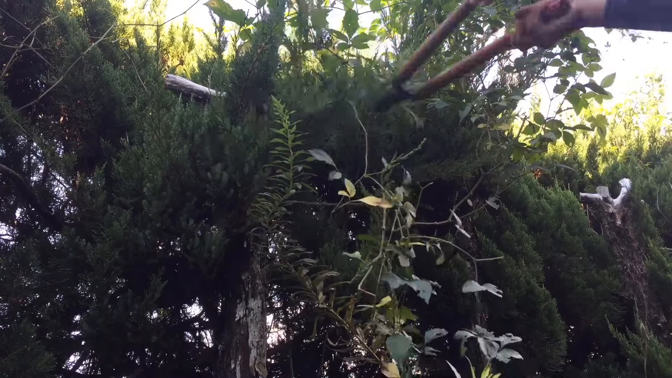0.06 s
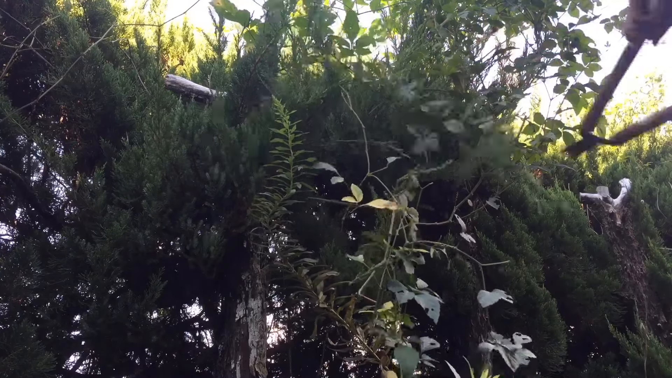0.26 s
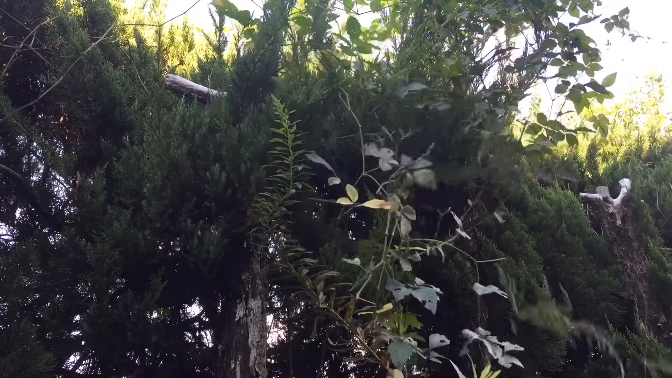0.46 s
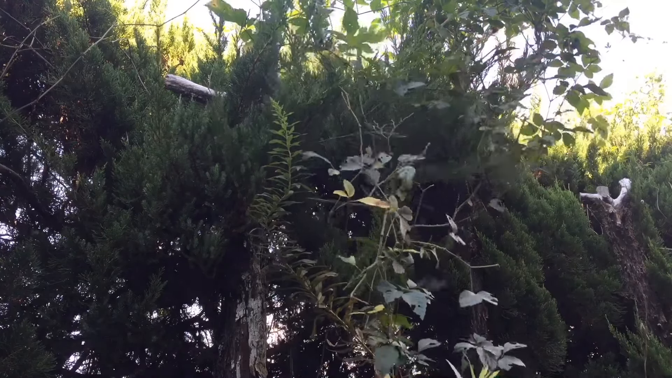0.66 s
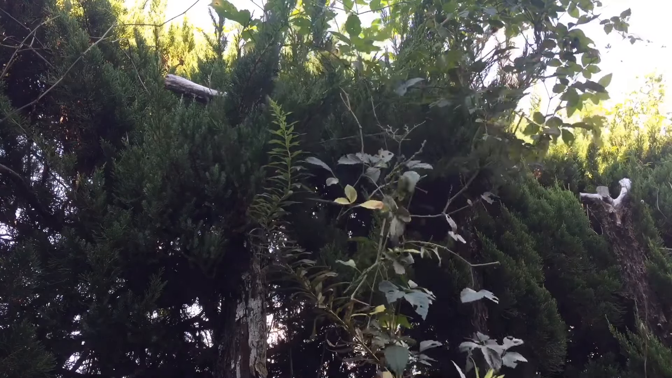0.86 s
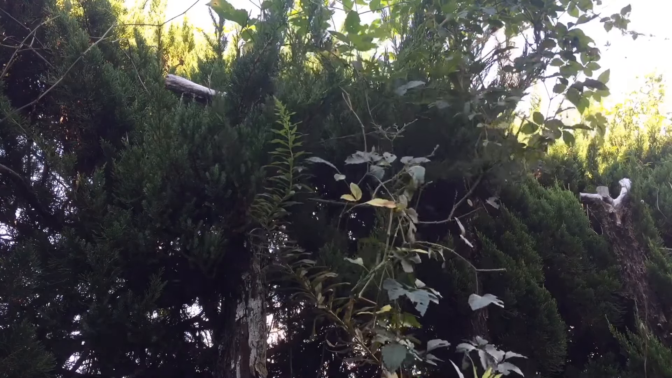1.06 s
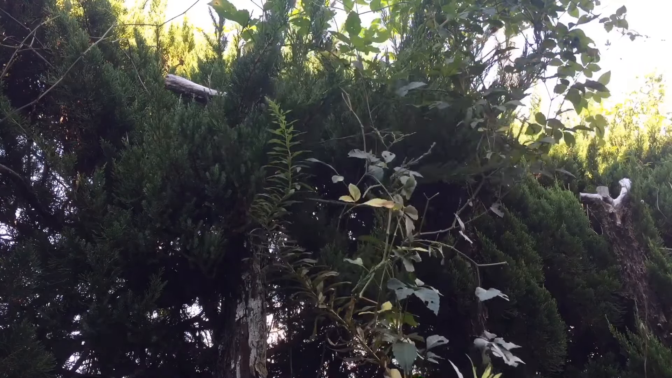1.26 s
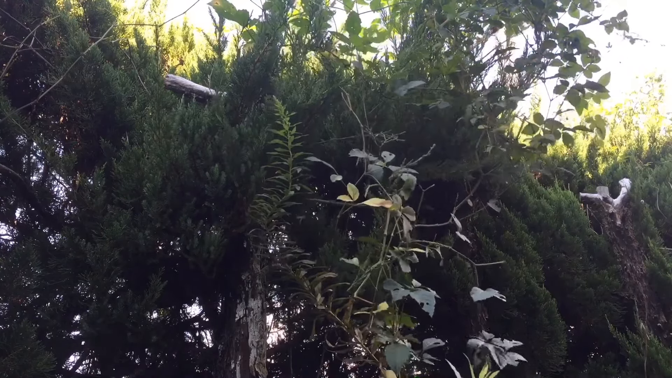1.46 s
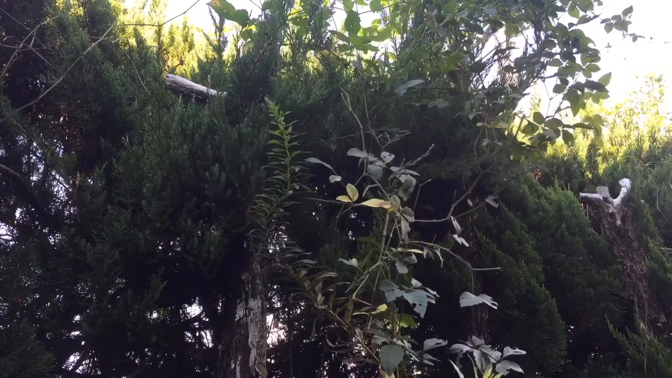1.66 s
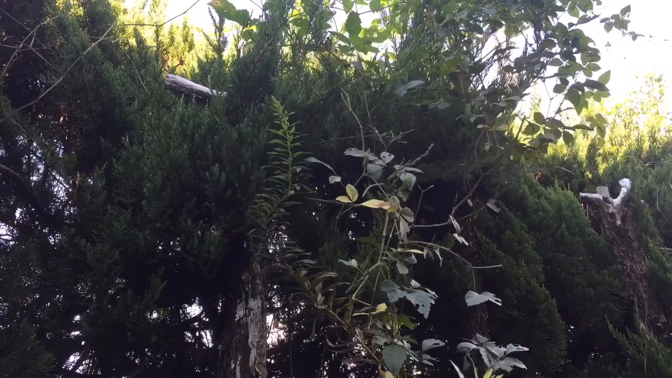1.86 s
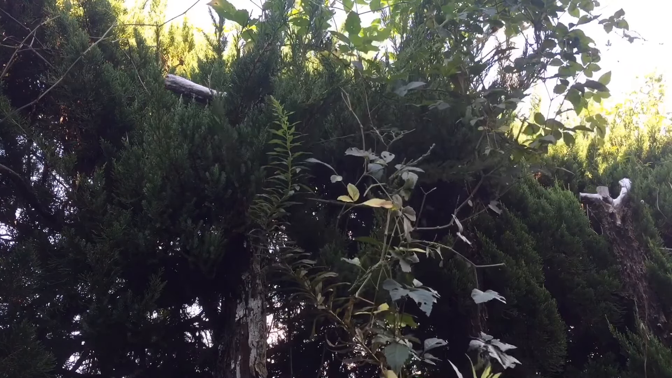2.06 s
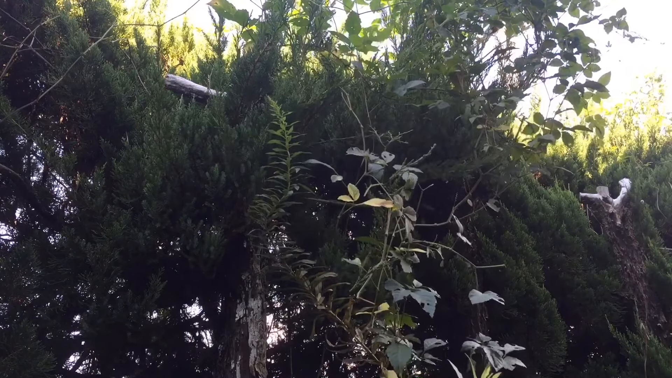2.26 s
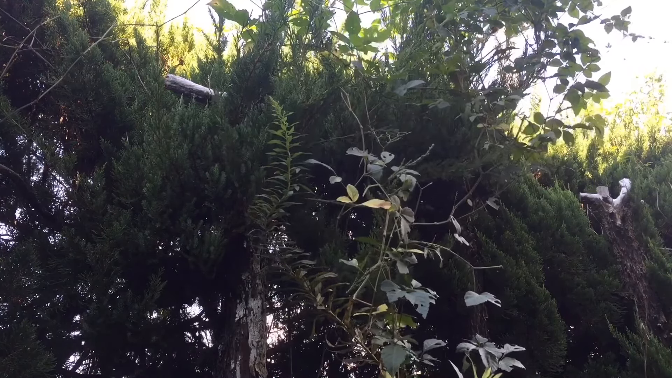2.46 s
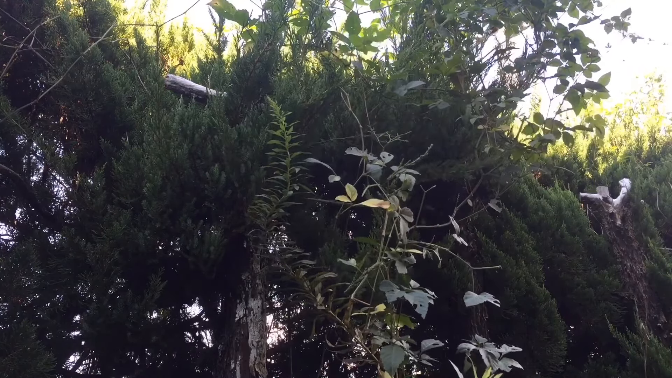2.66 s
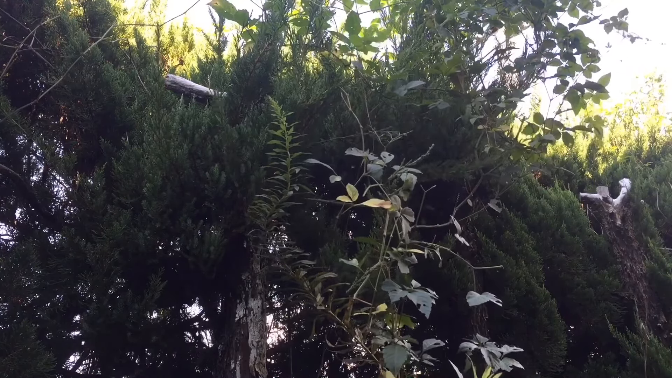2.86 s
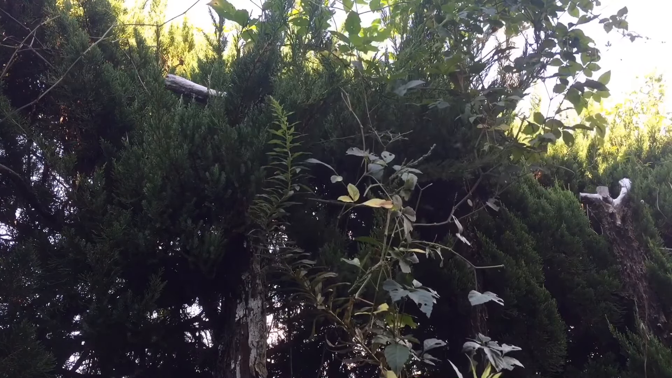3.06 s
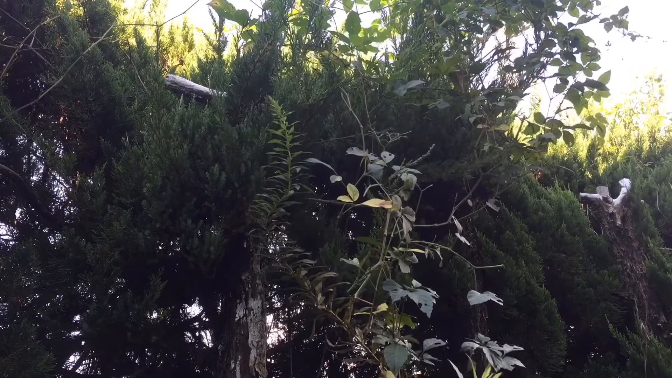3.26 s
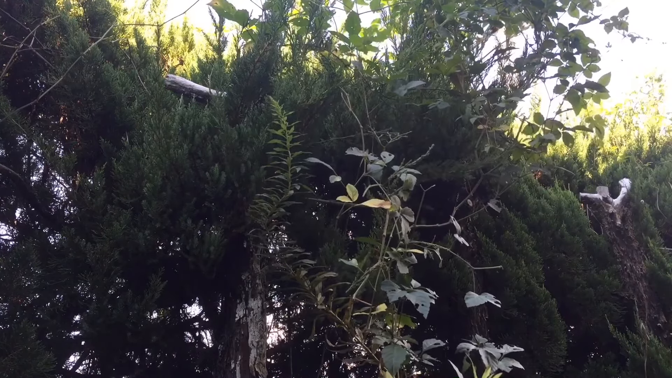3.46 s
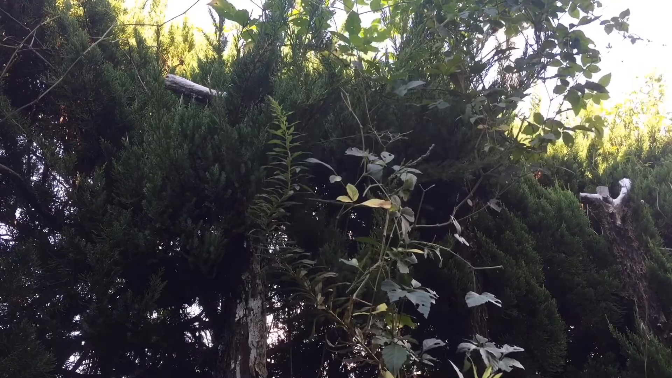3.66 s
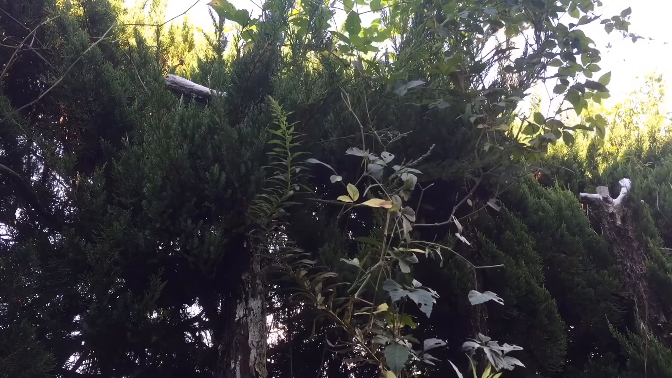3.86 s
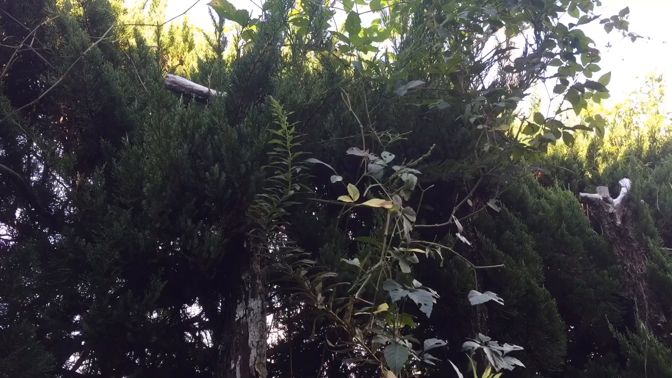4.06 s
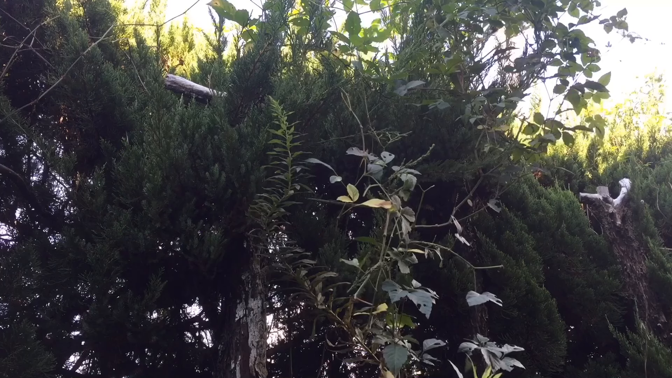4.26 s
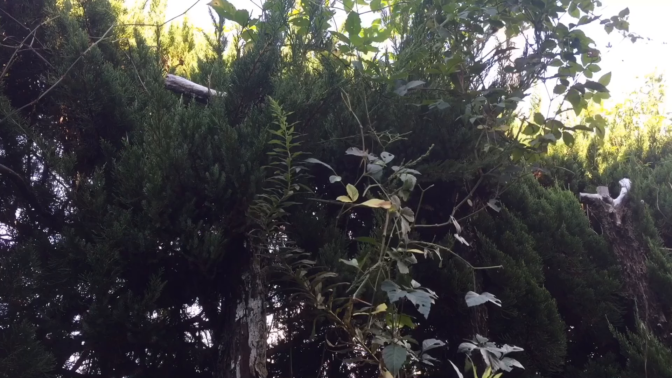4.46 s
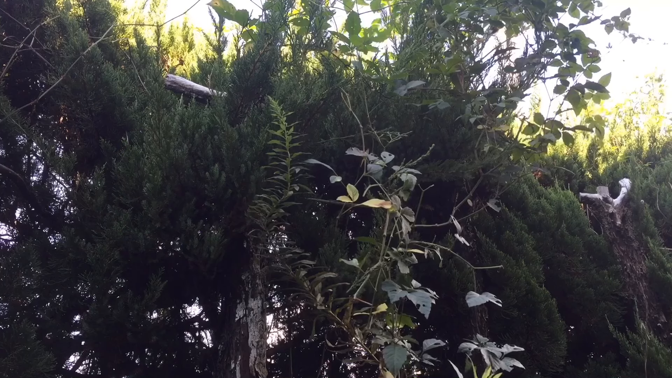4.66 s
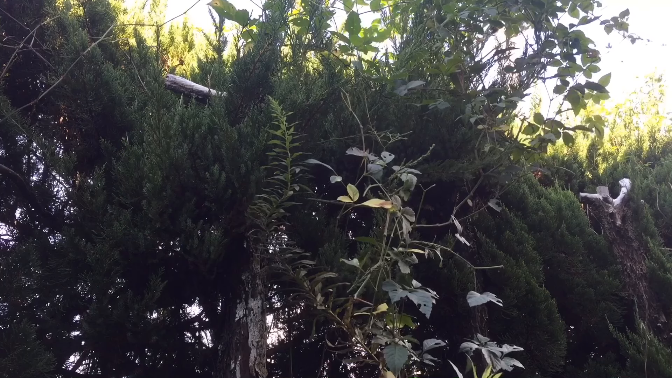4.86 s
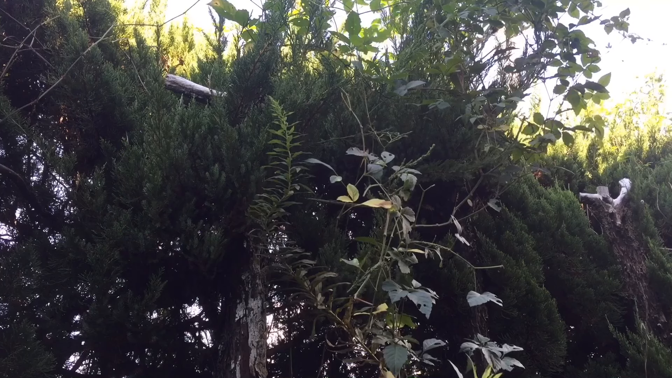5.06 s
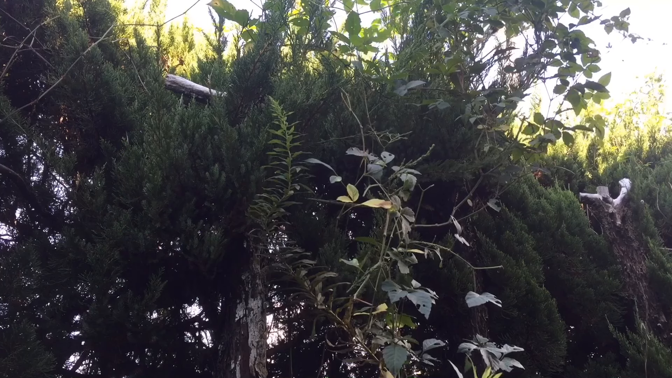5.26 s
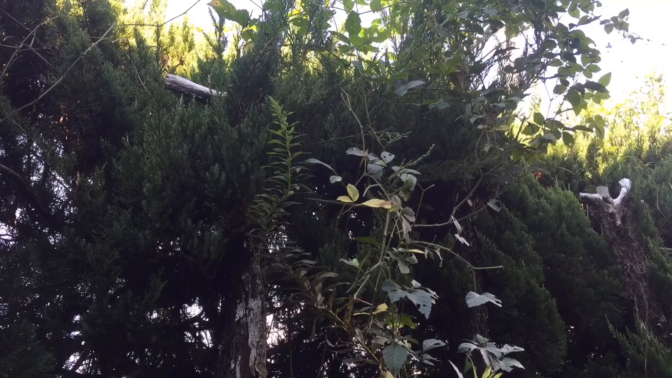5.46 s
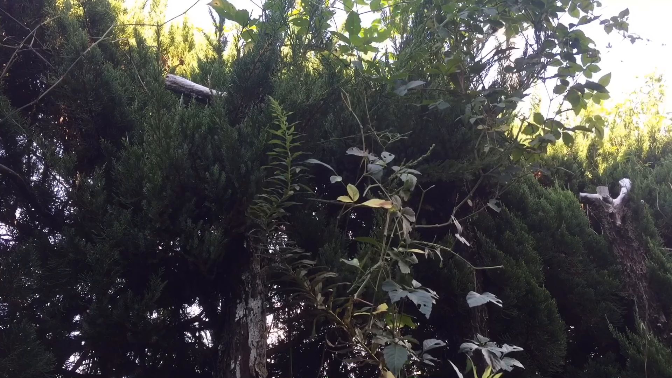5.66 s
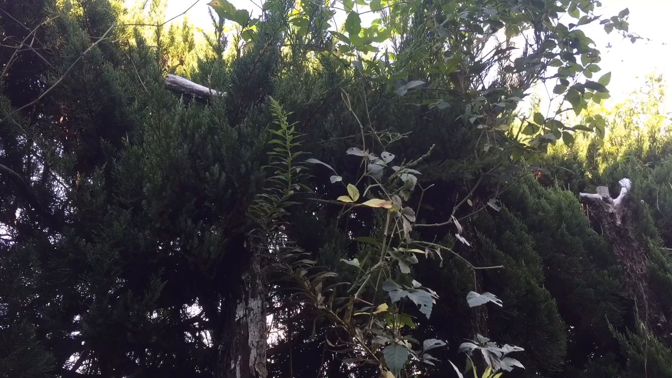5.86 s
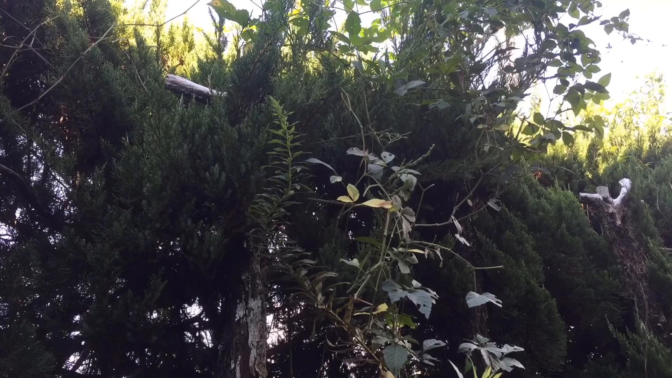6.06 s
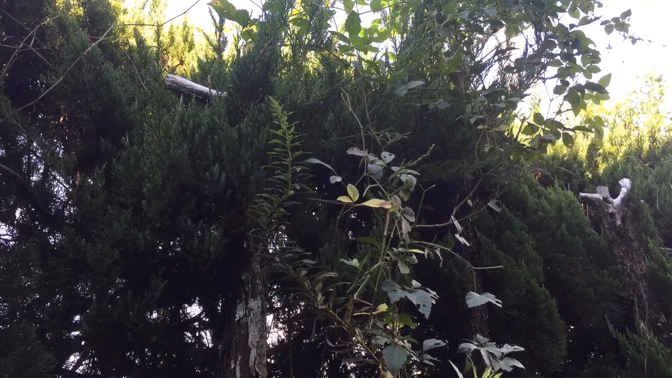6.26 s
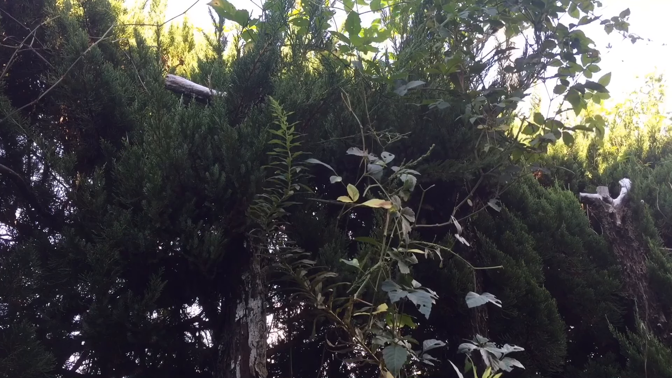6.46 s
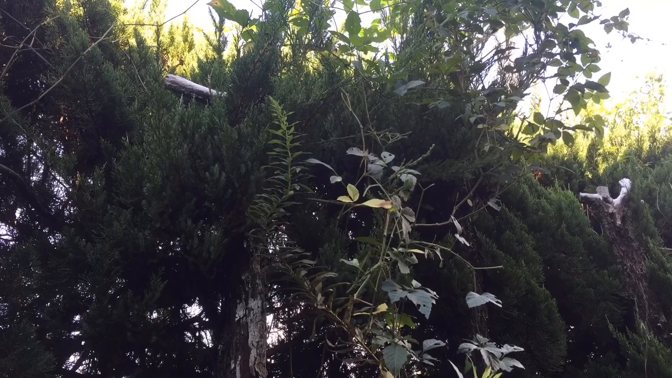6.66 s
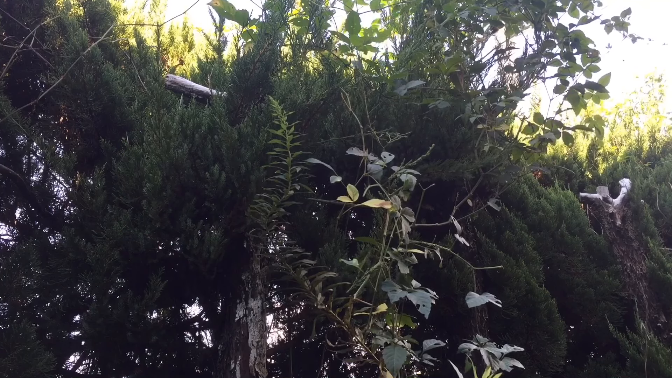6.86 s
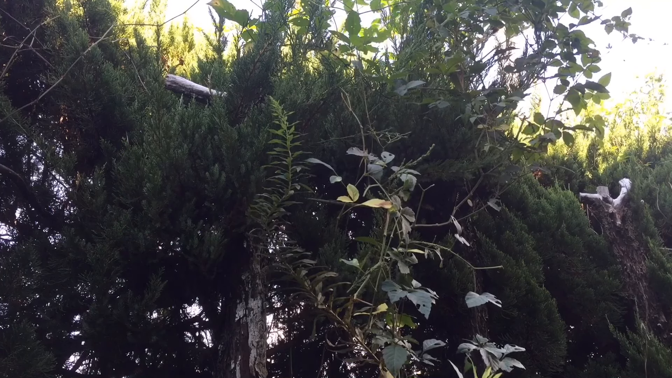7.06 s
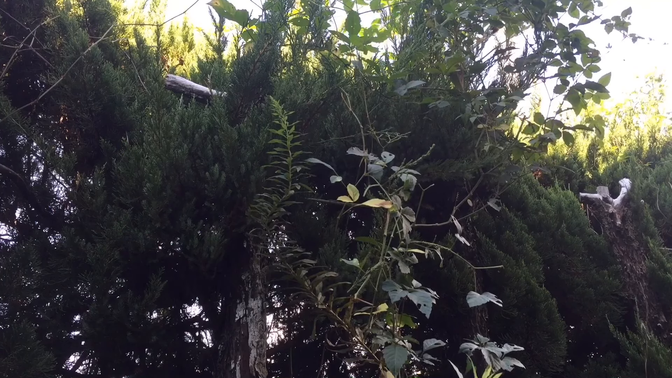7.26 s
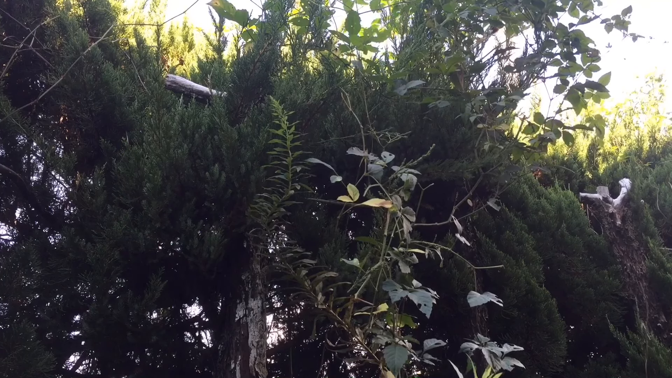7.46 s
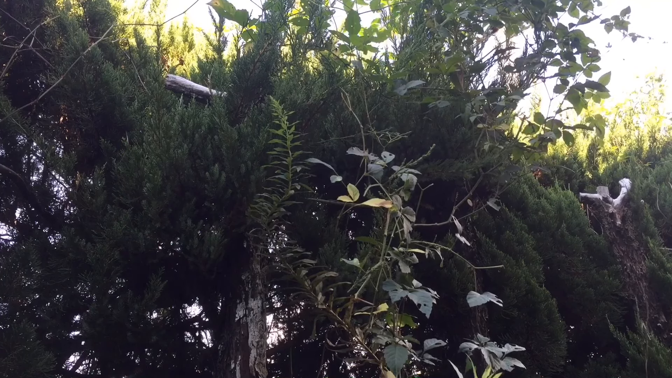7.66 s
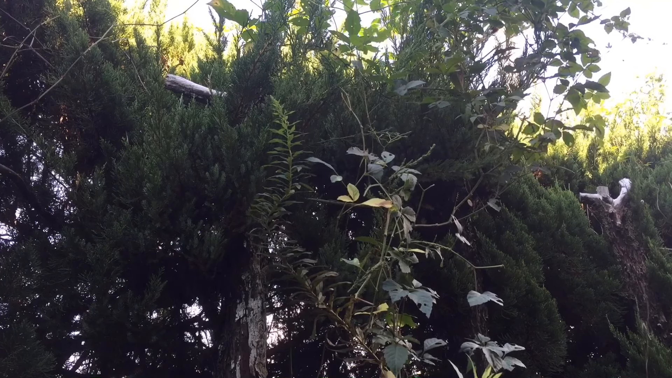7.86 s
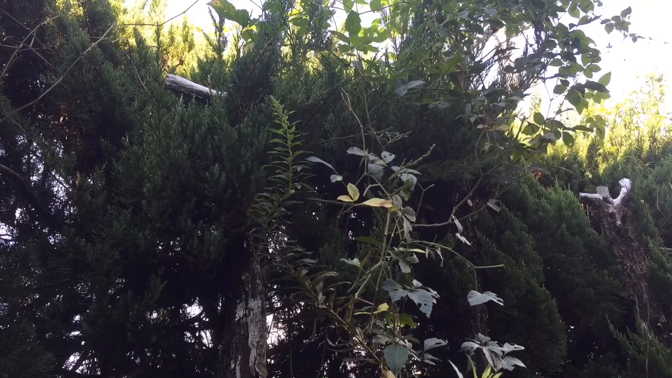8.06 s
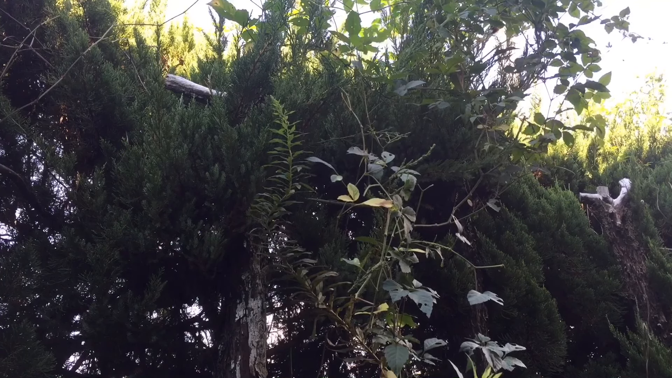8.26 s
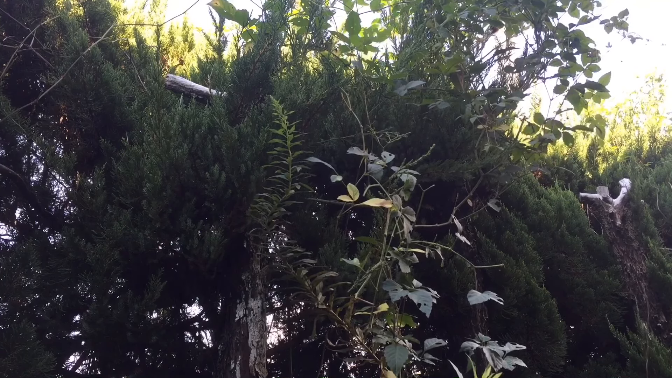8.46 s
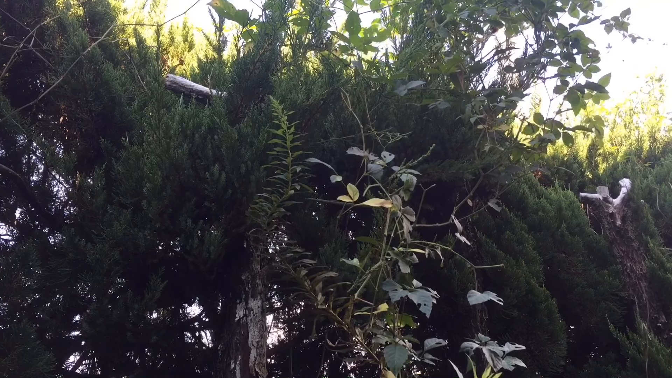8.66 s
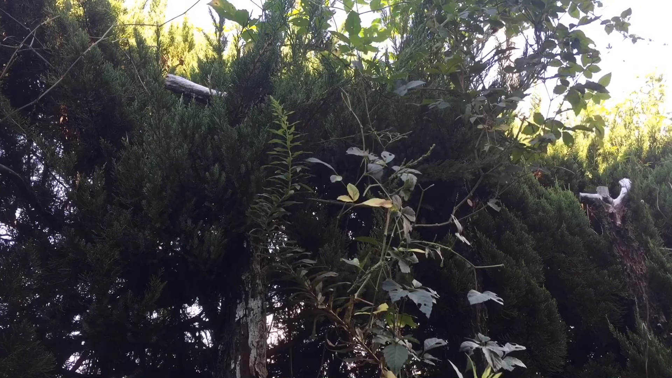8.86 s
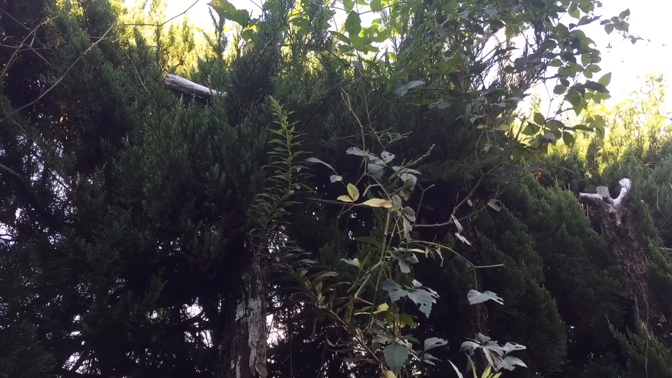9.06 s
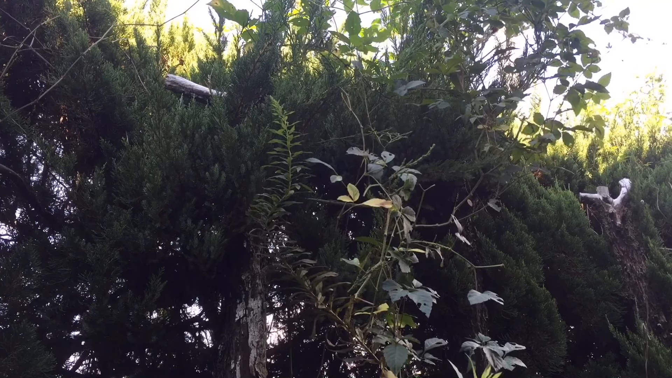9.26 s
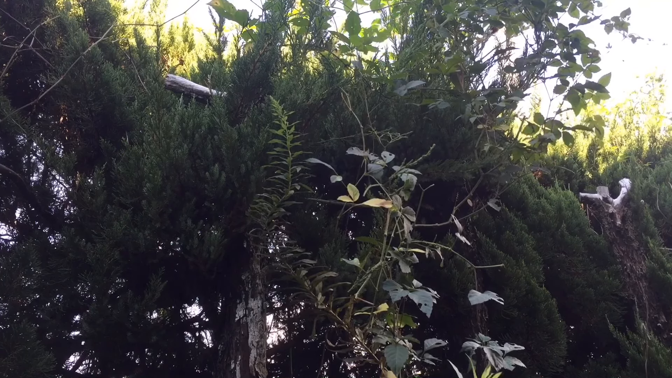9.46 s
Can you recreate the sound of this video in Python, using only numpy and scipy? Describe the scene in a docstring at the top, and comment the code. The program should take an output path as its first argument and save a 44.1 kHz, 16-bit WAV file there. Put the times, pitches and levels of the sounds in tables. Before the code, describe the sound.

Long-handled shears bite through a dry branch, then twigs snap and leaves crunch over wind rumble and a faint hum, with a brief hiss late.

```python
"""A garden, on one microphone. Wind buffets it at first, and two far machines hum a few hertz apart,
so that the bass throbs throughout. Close by, long-handled shears bite through a dry branch; then twigs
snap and dry leaves crunch. Halfway, a bird chirps once, faintly. Later a branch is dragged nearby,
and near the end something hisses for a second like a spray nozzle."""
import sys
import numpy as np
from scipy import signal
from scipy.fft import rfft, irfft, next_fast_len
from scipy.io import wavfile
from scipy.ndimage import uniform_filter1d

SR = 44100
rng = np.random.default_rng(int(sys.argv[2]) if len(sys.argv) > 2 else 0)


def generate_wav(sig):
    """Save sig (samples, or channels by samples) to the path in sys.argv[1] as 16-bit PCM at SR."""
    pcm = np.round(np.clip(np.atleast_2d(sig).T, -1, 1) * 32767).astype(np.int16)
    wavfile.write(sys.argv[1], SR, pcm)


N = 419832
TIME = np.arange(N) / SR


def gain_of(db):
    """Decibels to an amplitude factor."""
    return 10 ** (np.asarray(db) / 20)


def unit_rms(x):
    """Scales to rms 1."""
    return x / np.sqrt(np.mean(x ** 2) + 1e-20)


def shaped(x, points):
    """Filters by a spectrum of (Hz, dB) points."""
    point_hz, db = np.transpose(points)
    size = next_fast_len(len(x))
    hz = np.fft.rfftfreq(size, 1 / SR)
    response = gain_of(np.interp(np.log(hz + 1), np.log(point_hz + 1), db))
    return irfft(rfft(x, size) * response, size)[:len(x)]


def curve(points, outside=None):
    """Joins (seconds, value) points into a curve over the whole time."""
    return np.interp(TIME, *np.transpose(points), left=outside, right=outside)


def body(x, modes):
    """Rings x through steep (Hz, width Hz, dB) resonances of alternating sign; rms 1."""
    out = 0
    for k, (hz, width, db) in enumerate(modes):
        peak = signal.iirpeak(min(hz, .45 * SR), hz / width, SR)
        out += (-1) ** k * gain_of(db) * signal.lfilter(*peak, signal.lfilter(*peak, x))
    return unit_rms(out)


def wander(hz):
    """Random drift, mostly slower than hz; rms 1."""
    return unit_rms(shaped(rng.standard_normal(N), [(hz, 0), (4 * hz, -40), (SR, -200)]))


def mottled(x, db, frame, bins, frames):
    """Random patches of db depth over pitch and time, bins wide and frames long."""
    spectra = signal.stft(x, nperseg=frame)[2]
    patches = uniform_filter1d(rng.standard_normal(spectra.shape), bins, axis=0)
    patches = uniform_filter1d(patches, frames, axis=1)
    return signal.istft(spectra * gain_of(db * unit_rms(patches)), nperseg=frame)[1][:N]


# The background beyond the garden. Each row: frequency in Hz, relative level in dB.
AIR_SPECTRUM = [(88, -11.5), (150, -3.5), (483, -14), (1140, -16), (2790, -20), (3880, -22.5),
                (4910, -23.5), (5410, -21), (8470, -24.5), (14600, -30.5), (15800, -30.5)]


def air():
    """Far leaves and town merge into a soft, nearly steady hiss."""
    return gain_of(-69 + 0.12 * wander(18)) * unit_rms(shaped(rng.standard_normal(N), AIR_SPECTRUM))


# The lower of the two far machines. Each row: time in seconds, pitch in Hz.
HUM_PITCH = [(0.0, 72.7), (0.6, 71.08), (1.19, 72.31), (1.78, 70.06), (2.38, 69.18), (2.97, 68.84),
             (3.57, 70.39), (4.16, 68.83), (4.76, 69.26), (5.36, 70.04), (5.95, 70.63), (6.54, 71.05),
             (7.14, 68.78), (7.74, 70.87), (8.33, 69.53), (8.92, 71.23), (9.52, 68.99)]
# Both machines swell together at the microphone. Each row: time in seconds, the lower one's level in dB.
HUM_LEVEL = [(0, -68), (1.2, -64), (2.4, -59), (3, -62), (4.2, -56), (5.4, -56.5), (6, -60), (6.6, -62),
             (7.2, -57), (7.8, -56), (8.9, -57.5), (9.52, -58.5)]
# The higher machine, an engine, also sounds a fifth up. Each row: time in seconds, level in dB.
FIFTH_LEVEL = [(0, -77), (2.6, -75.5), (3, -64), (5.6, -70.5), (6.6, -74.5), (9.52, -73.5)]


def machines(engine_hz=77.0):
    """Two tones beat and waver on the way through the air; the engine brings two overtones."""
    hum_turns = np.cumsum(curve(HUM_PITCH)) / SR
    engine_turns = engine_hz * TIME + .40
    hum_db = curve(HUM_LEVEL)
    tones = [(hum_turns, hum_db), (engine_turns, hum_db - 1.5),
             (1.5 * engine_turns, curve(FIFTH_LEVEL)), (2 * engine_turns, -81)]
    return np.sqrt(2) * sum(gain_of(db + 1.3 * wander(3.4)) * np.cos(2 * np.pi * turns)
                            for turns, db in tones)


# Wind rumbling on the microphone. Each row: time in seconds, level in dB.
GUSTS = [(0, -62), (.82, -49.5), (1.14, -67.5), (1.35, -56.5), (1.64, -68), (1.8, -58), (2.36, -65.5),
         (2.46, -55), (2.85, -54.5), (3.55, -63.5), (4.24, -63), (4.93, -59), (5.2, -62), (8.5, -68),
         (9.52, -67)]
# Single blows of wind on the microphone. Each row: start in seconds, level in dB, nominal pitch in Hz.
BUFFETS = [(0.077, -38, 67.6), (0.137, -46, 71), (.258, -52, 59.4), (0.342, -42.5, 69), (0.418, -43, 68.6),
           (.49, -40.5, 63), (0.559, -40, 64), (.555, -45, 184), (.584, -38.5, 110), (0.709, -34, 77.4),
           (0.762, -37.5, 107.6), (.802, -40, 133.5), (.821, -35, 60.5), (0.855, -38, 90),
           (0.973, -46, 100), (1.232, -45.5, 58), (1.34, -42.5, 63.4), (1.465, -48, 65.5),
           (1.784, -46, 67.6), (1.928, -51, 68.6), (1.985, -44, 68.5), (2.414, -45.5, 77),
           (2.458, -40, 64.5), (2.579, -41.5, 69.6), (2.651, -42.5, 110), (2.778, -41, 63.7),
           (2.895, -45.5, 87), (3.123, -53, 49)]


def wind(buffet_s=0.0502):
    """Lumpy pressure at the microphone port, and blows that swing a few times as their pitch sinks."""
    spectrum = [(18, -62), (36, -9.5), (50, 5.5), (90, 0), (140, -12.5), (260, -32), (600, -47.5)]
    rumble = unit_rms(shaped(rng.standard_normal(N), spectrum))
    out = gain_of(curve(GUSTS) + 3.3 * wander(15)) * rumble
    progress = np.arange(0, 1, 1 / (SR * buffet_s))
    envelope = np.sin(np.pi * progress ** 0.73) ** 2
    for s, db, hz in BUFFETS:
        phase = 2 * np.pi * hz * buffet_s * (1.15 * progress - 0.246 * progress ** 2)
        offset = 2 * np.pi * rng.random(2)
        swing = np.sin(phase + offset[0]) + 0.39 * np.sin(1.86 * phase + offset[1])
        sharp_edge = 0.06 * np.sin(3.28 * phase) + 0.027 * np.sin(6.1 * phase)
        add(out, s, gain_of(db) * (swing + sharp_edge) * envelope)
    return out


def add(mix, s, sound):
    """Mixes a sound in at s seconds."""
    part = mix[round(s * SR):][:len(sound)]
    part += sound[:len(part)]


def litter_breaks(per_s=6000, spread_db=3, clump_db=3):
    """Twigs and leaves give way in dense, tiny breaks of uneven size that come in clumps."""
    breaks = (rng.random(N) < per_s / SR) * rng.choice([-1., 1.], N)
    breaks *= gain_of(spread_db * np.minimum(rng.exponential(1, N), 4) + clump_db * wander(100))
    breaks += 0.53 * rng.standard_normal(N)  # leaves sliding over each other
    return mottled(breaks, db=3.2, frame=256, bins=3, frames=4)  # each bit has its own ring


# Resonances of the litter on the ground: wood, papery leaves and their finest fizz.
# Each row: centre in Hz, width in Hz, level in dB.
WOOD_MODES = [(632, 490, -4), (1016, 400, -2.5), (1244, 390, 1.5), (1616, 267, -2), (1987, 420, 2),
              (2395, 870, -3.5)]
LEAF_MODES = [(3920, 2470, 4), (5370, 1200, 4.5), (6380, 2200, 4), (8680, 3200, -10)]
FIZZ_MODES = [(9380, 420, 4.5), (12020, 6700, -4.5), (15300, 7900, -6.5)]
# Crunches near the microphone. Each row: peak time, swell and fall in seconds, the wood's peak level
# in dB, then leaf and fizz levels in dB relative to the wood.
CRUNCHES = [(.092, 0.079, .05, -58, -2.5, -6), (0.113, 0.018, 0.042, -42.5, -9, -4),
            (.139, .02, 0.038, -39.5, 3, -4), (0.164, 0.015, 0.043, -42, 0, -5),
            (.39, 0.36, 0.065, -68.5, -6, -10), (.445, 0.03, .027, -53.5, -0.5, -12),
            (.543, 0.03, 0.017, -58.5, -8, -18), (.583, 0.012, 0.043, -61.5, 10.5, 6.5),
            (.64, 0.12, 0.23, -71, 8.5, 3), (0.698, 0.01, 0.025, -45, 1, -10),
            (.782, 0.15, 0.18, -60.5, 7, 5.5), (.836, 0.051, 0.067, -66, -3, 11),
            (.862, 0.027, 0.14, -57, 7.5, 4.5), (.892, 0.026, 0.078, -47.5, 0, -10),
            (.972, .05, 0.044, -72, 13, 16), (.99, .05, 0.94, -74.5, 6, 4),
            (2.17, 0.32, 0.21, -70, -3.5, -5), (2.234, 0.086, 0.04, -70.5, 13.5, 2),
            (2.592, 0.35, .33, -70, -4, -17), (2.771, 0.028, 0.15, -59.5, -6, -21),
            (2.806, 0.015, 0.063, -46, -3.5, -13), (2.903, 0.029, 0.014, -42.5, -14, -43),
            (2.951, .008, 0.079, -50, -3, -19), (2.965, 0.041, 0.026, -45.5, -8.5, -24),
            (3.678, .025, .1, -52.5, -2, -24), (3.697, 0.033, 0.028, -48, -1.5, -28),
            (3.875, 0.024, .1, -57, 3.5, -11), (3.903, 0.059, .04, -45, 3.5, -4),
            (3.977, 0.069, 0.03, -44, 3.5, -11), (4.214, 0.16, .14, -70, -2.5, -25),
            (4.412, 0.16, 0.13, -75, 8, 3), (4.889, 0.035, .08, -63, 3, -15),
            (4.927, 0.012, 0.13, -47.5, -2, -24), (4.975, 0.1, 0.034, -54, 5.5, -19),
            (5.003, 0.14, 0.048, -66, 11, -17), (5.242, .03, 0.12, -54, 2, -21),
            (5.307, 0.052, 0.046, -59, 4, -11), (5.38, 0.37, 0.41, -69, -7, -21),
            (5.69, .02, .05, -63, -2, -2), (5.716, .03, .04, -61, -0.5, -14),
            (6.62, 1.9, .03, -68.5, -8.5, -13), (6.972, .013, 0.08, -57.5, -14, -35),
            (7.603, 0.036, 0.1, -63, -6, -31), (7.63, .03, .04, -65, -6, -25),
            (7.931, 0.046, .03, -61.5, 1, -21), (8.02, 0.012, 0.037, -44.5, -3.5, -27)]


def crunches(breaks, span_db=30):
    """Tiny breaks ring through wood and leaf; each crunch swells and falls, then the litter settles."""
    bands = np.array([body(breaks, modes) for modes in (WOOD_MODES, LEAF_MODES, FIZZ_MODES)])
    power = np.zeros((3, N))
    for s, swell_s, fall_s, db, leaf_db, fizz_db in CRUNCHES:
        at = slice(max(0, round((s - 2 * swell_s) * SR)), round((s + 1) * SR))
        t = TIME[at] - s
        settling_db = -26.5 - 92 * t
        falling_db = np.maximum(-span_db * t / fall_s, settling_db)
        wood_db = db + np.where(t < 0, span_db * t / swell_s, falling_db)
        power[:, at] += gain_of([wood_db, wood_db + leaf_db, wood_db + fizz_db]) ** 2
    return (np.sqrt(power) * bands).sum(0)


# Dry wood snapping close by, first between the blades. Each row: start in seconds, the ring's peak
# level in dB, its pitch in Hz, treble crack in dB relative to the ring.
SNAPS = [(.094, -37.5, 1260, -1), (.109, -33.5, 3030, -1), (.112, -29, 3700, 2), (.117, -35, 4070, -8),
         (.124, -32, 1940, -4), (.135, -27.5, 3920, -3), (0.139, -32.5, 1860, -3), (.158, -26.5, 2080, -2),
         (0.166, -28.5, 3060, 2.5), (.171, -39, 1980, -16), (.185, -41.5, 3780, -8),
         (.363, -50.5, 1620, -13), (.396, -51, 1160, -12), (0.446, -51, 1750, -3),
         (0.537, -51.5, 1190, -14), (0.574, -46, 6310, -1), (.698, -38.5, 4220, -7), (0.782, -49, 1230, -8),
         (0.84, -48, 880, -12), (.884, -41, 2110, 11), (.91, -35.5, 4500, -6), (.968, -34.5, 5740, -6.5),
         (1.074, -54, 3400, -4), (2.063, -55, 1830, -1), (2.792, -26.5, 4130, -4),
         (2.793, -22.5, 1534, -3.5), (2.796, -26.5, 1340, -20), (2.809, -58, 1250, -2),
         (2.893, -27.5, 1970, -32), (2.933, -48, 1500, -15), (2.952, -40, 1840, -24),
         (3.674, -36.5, 1860, -19), (3.688, -37, 1680, -5), (3.898, -31.5, 6400, -2), (3.959, -37, 4150, 1),
         (4.018, -41.5, 2140, -1.5), (4.204, -52.5, 1004, -13), (4.878, -45.5, 2000, 4),
         (4.928, -39.5, 2340, 6.5), (5.353, -47.5, 1610, -10), (5.43, -54.5, 890, -0.5),
         (5.679, -51, 1470, -5), (6.13, -51.5, 1580, -12), (6.505, -50, 1740, -20), (6.538, -55, 1100, -9),
         (6.635, -38.5, 1390, -12), (6.816, -32, 1960, -21), (6.856, -33, 2180, -16),
         (6.969, -55, 2700, -11), (6.974, -47.5, 1270, -32), (7.108, -58, 2400, -15),
         (7.12, -54, 2300, -18), (7.13, -60, 2300, -15), (7.179, -59, 1240, -2), (7.596, -49, 2650, -3),
         (7.928, -49, 1246, 4.5), (8.014, -39, 1895, 0), (8.058, -42.5, 1340, -21),
         (8.355, -33.5, 2280, -26), (8.544, -45.5, 1190, -20), (8.548, -41.5, 2870, -8),
         (8.77, -48, 6350, -11), (8.841, -38.5, 2400, 7)]


def snaps(t60_s=0.02, rise_s=0.00027):
    """A break is a sudden shower of splinters: the twig rings briefly under a bright crack."""
    t, out = np.arange(3000) / SR, np.zeros(N)
    for s, db, hz, crack_db in SNAPS:
        noise = rng.standard_normal(len(t))
        splinters = noise * abs(noise) * gain_of(-60 * t / t60_s) * (1 - np.exp(-t / rise_s))
        splinters[8] = 3.9  # the first fibre
        width = 0.44 * hz * gain_of(0.1 * crack_db)  # a dull snap rings more clearly
        ring = body(splinters, [(hz, width, 0), (0.721 * hz, 0.11 * hz, -4),
                                (1.91 * hz, 0.2 * hz, -5), (2.6 * hz, 0.13 * hz, -11)])
        crack = body(splinters, LEAF_MODES)
        snap = ring / abs(ring).max() + gain_of(crack_db) * crack / abs(crack).max()
        add(out, s, gain_of(db) * snap)
    return out


# Dull knocks of wood nearby. Each row: start in seconds, level in dB, pitch in Hz.
KNOCKS = [(.112, -43, 556), (.136, -48.5, 466), (.159, -51, 566), (.43, -48.5, 249), (.7, -41.5, 228),
          (.779, -46, 151), (.895, -46.5, 390), (2.794, -32.5, 321), (2.949, -38, 370), (3.688, -45.5, 187),
          (3.894, -40.5, 376), (3.973, -41, 370), (4.935, -49, 430), (5.25, -58, 655), (5.3, -49, 608),
          (5.309, -37.5, 200), (5.701, -55, 630), (6.623, -49, 550), (8.011, -35, 348), (8.026, -36.5, 147)]


def knocks(t60_s=0.034, rise_s=0.00071):
    """A soft push makes the wood swing a few times in three modes."""
    t, out = np.arange(6000) / SR, np.zeros(N)
    for s, db, hz in KNOCKS:
        phase = 2 * np.pi * hz * t
        swing = np.sin(phase) + 0.57 * np.sin(1.64 * phase) + .5 * np.sin(0.485 * phase)
        add(out, s, gain_of(db - 60 * t / t60_s) * swing * (1 - np.exp(-t / rise_s)))
    return out


# Brittle leaves ticking close by. Each row: start in seconds, peak level in dB, main resonance in Hz.
LEAF_TICKS = [(2.6174, -48, 2760), (3.2139, -42.5, 9400), (3.8715, -31, 5000), (3.8844, -29, 6820),
              (3.9094, -28, 5400), (3.9763, -19, 4100), (4.8973, -31.5, 5950), (4.9212, -34, 3670),
              (4.9274, -32, 4500), (4.9564, -31, 4640), (4.973, -27, 4200), (4.9825, -27.5, 3900),
              (4.9945, -38, 3860), (5.0032, -34, 4060), (5.0174, -41, 5100), (5.0644, -58, 3610),
              (5.2364, -44, 5430), (5.2437, -43, 4430), (5.2504, -37, 4900), (5.269, -33, 3700),
              (5.3048, -29, 3500), (5.7124, -61, 2740), (6.321, -50.5, 2830), (6.379, -49, 3370),
              (6.6544, -35, 2780), (6.8755, -34, 4040)]


def leaf_ticks():
    """Each tick is one clean break: a click with a wide, very short ring."""
    click, out = signal.unit_impulse(400), np.zeros(N)
    for s, db, hz in LEAF_TICKS:
        tick = body(click, [(hz, 0.33 * hz, 0), (6400, 2200, -4), (2100, 700, -9)])
        add(out, s, gain_of(db) * tick / abs(tick).max())
    return out


def bird(start_s=4.68, length_s=.05, low_hz=3700, high_hz=5340, db=-74):
    """One faint, broken, rising whistle."""
    progress = np.clip((TIME - start_s) / length_s, 0, 1)
    hz = low_hz + (high_hz - low_hz) * progress
    envelope = np.sin(np.pi * progress) * gain_of(db + 4 * wander(40))
    return np.sqrt(2) * envelope * np.sin(2 * np.pi * np.cumsum(hz) / SR)


# Resonances of the dragged branch. Each row: centre in Hz, width in Hz, level in dB.
BRANCH_MODES = [(216, 230, -11.5), (510, 330, -12.5), (952, 246, 0), (1340, 440, -4), (1980, 710, 0),
                (2750, 490, -8.5)]
# Its pull over the ground nearby. Each row: time in seconds, the wood's level in dB.
DRAG_LEVEL = [(6.625, -63), (6.64, -58), (6.67, -53.5), (6.76, -49), (6.825, -43.5), (6.878, -44.5),
              (6.897, -65), (6.93, -88)]


def dragged_branch(breaks):
    """A branch rasps through the litter, ringing with the tiny breaks, and stops short."""
    leaves = gain_of(-5) * body(breaks, LEAF_MODES) + gain_of(-26) * body(breaks, FIZZ_MODES)
    return gain_of(curve(DRAG_LEVEL, outside=-200)) * (body(breaks, BRANCH_MODES) + leaves)


# The nozzle-like hiss near the microphone. Each row: frequency in Hz, relative level in dB
# before its three bands are balanced.
JET_SPECTRUM = [(350, -23), (600, -18.5), (789, -16), (1130, -11.5), (1440, -14.5), (1630, -8),
                (2460, -5.5), (3860, -4), (4190, -8.5), (5000, 2.5), (7650, -0.5), (8650, 2.5),
                (10500, -4.5), (12700, -4), (15800, -6.5)]
# Its low band comes and goes. Each row: time in seconds, level in dB relative to the middle band.
JET_LOW_LEVEL = [(8.17, -10), (8.3, -8), (8.6, -10.5), (8.85, -6.5), (9.0, -10), (9.15, -7)]


def nozzle(open_s=8.172, full_s=8.25, shut_s=9.132, gone_s=9.2, puff_db=-57.5, flow_db=-49.5):
    """Smooth turbulence with narrow, drifting streaks; it opens in two steps, flows and shuts."""
    start_s = open_s - .012
    db = curve([(start_s, -90), (open_s, puff_db), (full_s, flow_db), (shut_s, flow_db), (gone_s, -80)])
    jet = shaped(rng.standard_normal(N), JET_SPECTRUM)
    jet = mottled(jet, db=3.5, frame=1024, bins=3, frames=48)
    low = shaped(jet, [(2800, 0), (3200, -60), (SR, -60)])
    top = shaped(jet, [(1, -60), (10500, -60), (11000, 0)])
    middle = jet - low - top
    hiss = unit_rms(middle) + gain_of(curve(JET_LOW_LEVEL)) * unit_rms(low) + gain_of(-2) * unit_rms(top)
    flowing = uniform_filter1d(1. * (TIME > start_s) * (TIME < gone_s), 300)
    return flowing * gain_of(db + 0.83 * wander(28)) * hiss


def garden_scatter(x, t60_s=0.089, returns_per_s=3000):
    """Sparse returns reach the microphone from ground, stems and leaves."""
    t = np.arange(SR // 5) / SR
    taps = (rng.random(len(t)) < returns_per_s / SR) * rng.standard_normal(len(t))
    taps *= gain_of(-60 * t / t60_s) * (t > .003)
    taps = signal.lfilter([1], [1, -.5], taps)  # softens the treble
    return signal.oaconvolve(x, taps / np.linalg.norm(taps))[:N]


def scene():
    """Near sounds with their scatter, over wind, far machines, bird and air; mono."""
    near = snaps() + leaf_ticks() + knocks()
    breaks = litter_breaks()
    near += crunches(breaks) + dragged_branch(breaks) + nozzle()
    return (near + gain_of(-13.5) * garden_scatter(near) + wind() + machines() + bird() + air())[None]


# The response of the microphone's port. Each row: frequency in Hz, gain in dB.
PORT_RESPONSE = [(100, 0), (3900, 0.5), (4250, 0.5), (4600, -1.5), (7200, -3), (7700, -5.5), (8300, -2),
                 (9900, -2), (10450, -6), (11100, -2)]


def record(dry):
    """The microphone port dips the treble, and a steep low-pass limits the band."""
    coloured = shaped(dry[0], PORT_RESPONSE)
    low_pass = signal.firwin(1023, cutoff=15760, window=("kaiser", 9), fs=SR)
    return signal.oaconvolve(coloured, low_pass, "same")[None]


dry = scene()
out = record(dry)
generate_wav(out)
```